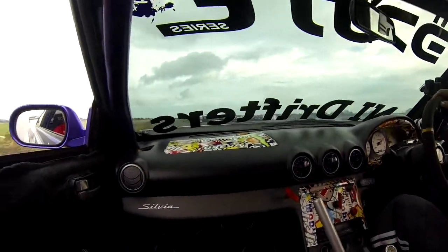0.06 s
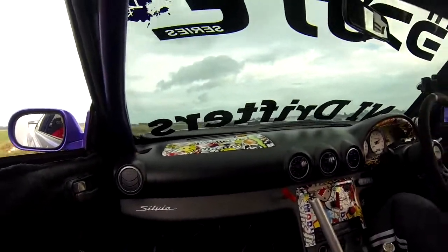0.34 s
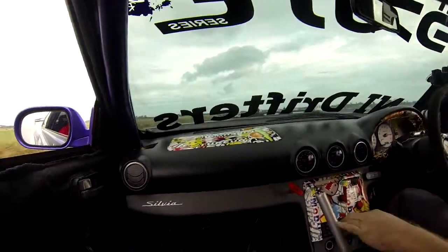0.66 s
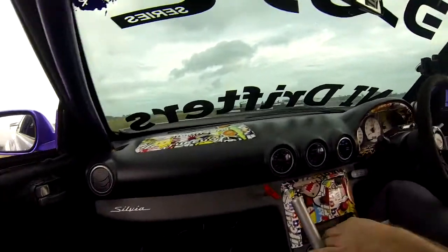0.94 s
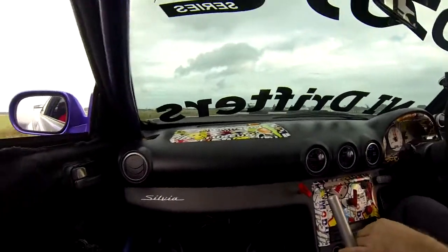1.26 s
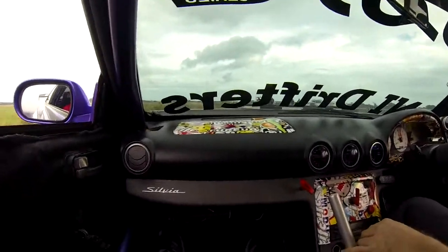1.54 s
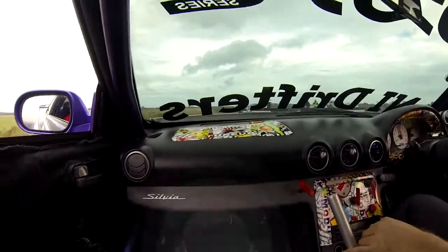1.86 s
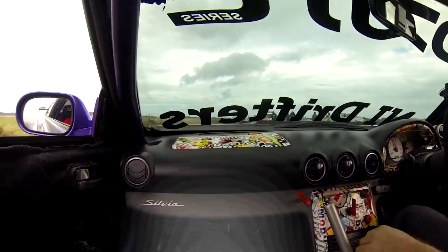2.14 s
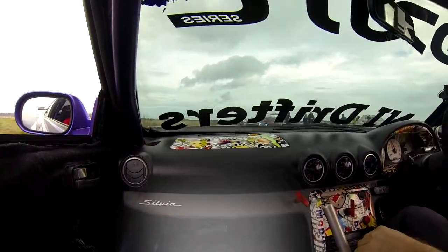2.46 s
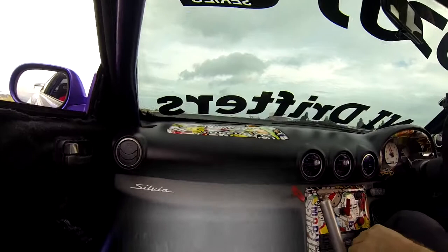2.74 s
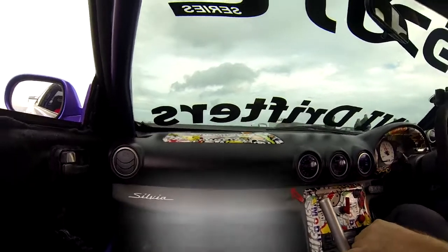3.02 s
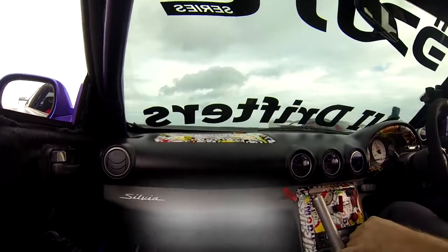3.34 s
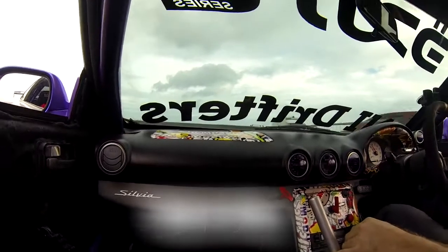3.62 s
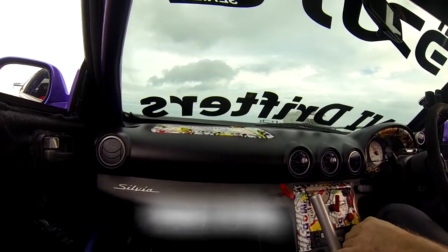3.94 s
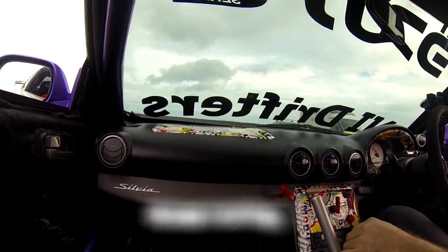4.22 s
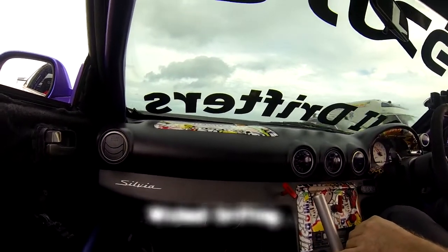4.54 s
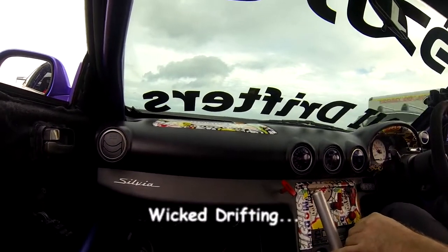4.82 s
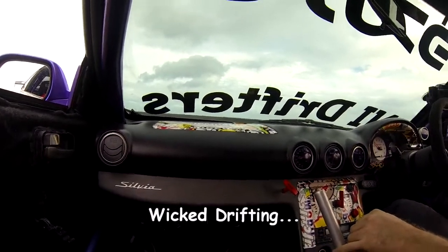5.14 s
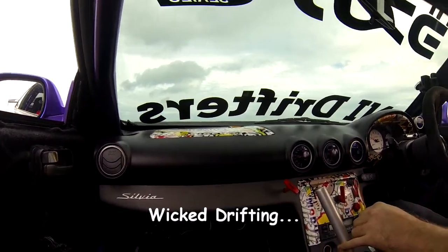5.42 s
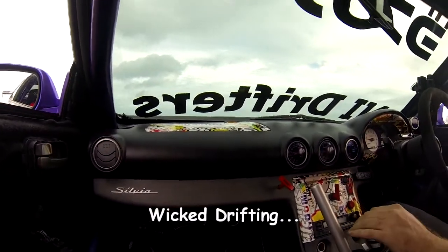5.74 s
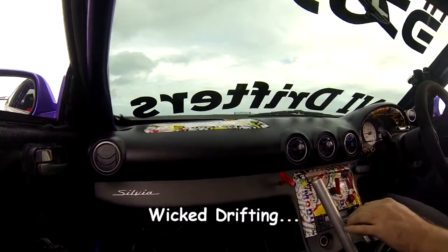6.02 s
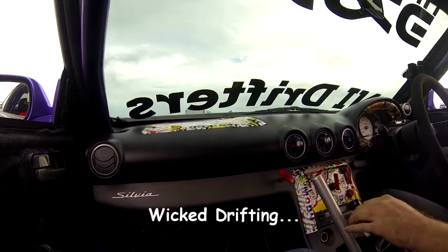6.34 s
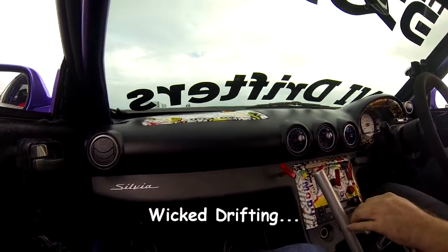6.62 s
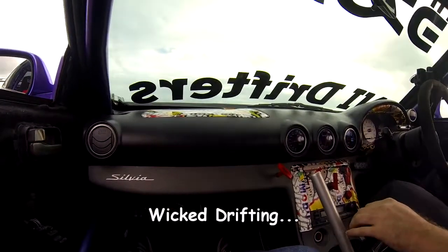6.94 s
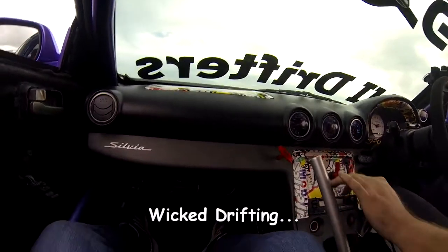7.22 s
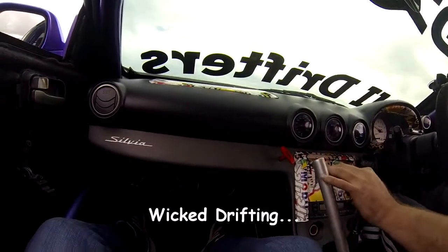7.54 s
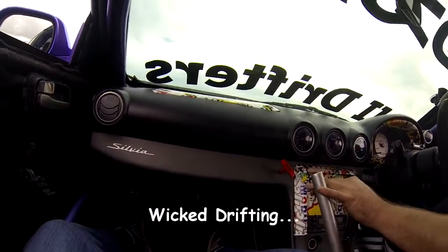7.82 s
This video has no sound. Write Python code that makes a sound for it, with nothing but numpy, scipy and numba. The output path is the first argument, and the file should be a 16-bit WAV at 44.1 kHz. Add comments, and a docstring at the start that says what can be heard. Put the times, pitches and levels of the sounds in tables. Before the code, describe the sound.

Inside a car, the engine flares over a brief tyre squeal, then coasts down amid road rumble and rattles before two throttle blips.

```python
"""A six-cylinder drift car engine, heard from the cabin, flares to its limiter and coasts down.
Its firings make the tone and the exhaust's growl; tyres stick and slip into a squeal, the turbo whistles.
The throttle shuts, the exhaust pops and burbles, and the boost vents. The road sets the body booming,
grit ticks in the wheel arches, panels knock and loose trim rattles.
Near the end the engine almost idles and is blipped twice."""
import sys
import numpy as np
from scipy import signal
from scipy.fft import rfft, irfft, next_fast_len
from scipy.io import wavfile
from scipy.ndimage import map_coordinates
from numba import njit

SR = 44100
rng = np.random.default_rng(int(sys.argv[2]) if len(sys.argv) > 2 else 0)


def waveform_to_disk(signal):
    """Save audio, clipped to [-1, 1], as 16-bit WAV at the path in sys.argv[1]."""
    frames = np.transpose(np.atleast_2d(signal))
    scaled = np.clip(frames, -1, 1) * 32767
    samples = np.round(scaled).astype(np.int16)
    wavfile.write(sys.argv[1], SR, samples)


N = 355887
T = np.arange(N) / SR
FIRINGS_PER_TURN = 3

# the revs, through flare, coast and two blips: time_s, firing_hz
REVS = [(0, 284.1), (.14, 305), (.44, 404.2), (.56, 381.2), (.84, 197.4), (1.05, 210), (2.5, 180.4),
        (3.8, 157.2), (4.6, 137.5), (5.3, 111), (5.7, 99.83), (6.1, 78.4), (6.3, 71.84), (6.53, 72.33),
        (6.68, 53.82), (6.87, 61.12), (6.93, 69.5), (7.0, 97.67), (7.25, 110.1), (7.55, 102.3),
        (7.61, 109.2), (7.8, 170.9), (7.86, 176.7), (8.07, 165.2)]
# floored in the slide, shut to coast, a touch at idle, two blips: time_s, opening (0-1)
THROTTLE = [(.06, 0.35), (.15, 0.93), (.38, 0.84), (.52, 0), (5.95, 0.02), (6.45, 0.2), (6.55, 0.07),
            (6.85, 0.2), (6.89, 0.93), (6.95, 1), (7.0, 0.44), (7.12, 0.61), (7.52, 0.1), (7.62, 0.6),
            (7.7, 0.28), (7.8, 0.26), (7.9, 0.24), (7.97, 0.02)]
# how exhaust and cabin pass an engine tone, droning near 140 Hz: pitch_hz, gain_db
DRONE = [(58, -16), (70, -14), (84, -20.5), (105, -13), (125, -12), (138, -1.5), (147, -3), (158, -12),
         (177, -18.5), (203, -12.5), (235, -19), (260, -18.5), (290, -26.5), (330, -21.5), (355, -29.5),
         (385, -36.5), (560, -27), (590, -16.5), (615, -19.5), (660, -10.5), (720, -23.5), (790, -30)]
# the weaker engine orders: crank_multiple
CRANK_ORDERS = np.array([1, 2, 2.5, 3.5, 4, 5, 7, 8, 9, 12, 15, 18])
# the balance of those orders: gain_db
ORDER_BALANCE = [-22, -6, -11, -28, -14, -27, -18, -9, -9, -13, -17, -25]
# colour of the exhaust pipe's growl: freq_hz, gain_db
GROWL_COLOUR = [(240, 4), (330, 11.5), (480, -5.5), (640, -1), (900, -12), (1250, -2), (1500, -10),
                (2200, -22)]
# colour of the gas rasp: freq_hz, gain_db
RASP_COLOUR = [(450, -3), (520, -19), (650, -1), (850, -2), (1300, -8.5), (2100, -5.5), (2650, -18.5),
               (3300, -14.5), (4300, -25), (5200, -27.5), (7300, -34.5), (10000, -31), (13000, -41.5),
               (15000, -48)]
# intake pipework singing under boost: pitch_hz, width_hz, gain_db
INTAKE_MODES = [(2160, 120, 1), (3020, 180, -4), (3350, 140, 1), (4950, 400, -16)]
# the short whistle as boost comes up: pitch_hz, width_hz, gain_db
WHISTLE_MODES = [(5030, 220, 0), (6230, 220, -5)]
# the turbo's blade tone: time_s, pitch_hz, level_db
TURBO = [(0, 9400, -60), (.1, 10700, -55), (.2, 13000, -68), (.4, 15000, -80), (.85, 14200, -78),
         (1.02, 13400, -63), (1.15, 12200, -73), (1.35, 10500, -76), (1.6, 9000, -88)]
# tyre squeal, swelling twice before the tyres grip: time_s, pitch_hz, level_db, breakup (0-1)
SQUEAL = [(0, 900, -20.5, 0.93), (.12, 931.5, -16, 0.87), (.2, 925, -18, 0.6), (.245, 954.6, -11.5, 0.02),
          (.285, 956, -11, 0), (.315, 975, -20.5, 0.35), (.39, 990, -12.5, .8), (.425, 955, -26, 0.5),
          (.455, 967, -18, 0.53), (.53, 948, -13.5, 0.12), (.56, 945, -15, 0.17), (.595, 928, -19, 0.27),
          (.635, 929, -18.5, .7), (.68, 910, -22.5, 0.79), (.715, 830, -21.5, 1), (.76, 804, -21, 0.88),
          (.8, 820, -26.5, 0.95)]
# tread ribs slipping apart: pitch_ratio, gain_db
RIBS = [(.925, -7), (.965, -2), (1, 0), (1.035, -3), (1.075, -8)]
# cabin resonances that the screech rings: pitch_hz, width_hz, gain_db
SCREECH_MODES = [(780, 22, 0), (1060, 30, -7), (1155, 28, -8)]
# rolling noise, easing as the car slows: time_s, road_db, air_db
RIDE = [(0, -32.5, -42), (.95, -28.5, -41), (1.7, -30, -45.5), (2.4, -29, -44.5), (3.4, -29.5, -46.5),
        (4.15, -33, -49), (4.75, -36, -51.5), (4.98, -34, -52.5), (5.12, -36.5, -49), (5.35, -33, -50),
        (5.75, -37, -51), (6.25, -30.5, -44), (6.85, -33, -48), (6.97, -37, -51), (7.1, -35.5, -47.5),
        (7.45, -38.5, -51), (8.07, -33, -48)]
# colour of the road's roar: freq_hz, gain_db
ROAD_COLOUR = [(300, 6), (420, -0.5), (490, -4.5), (620, -1.5), (780, -4.5), (880, -8), (1000, -6.5),
               (1250, -16), (1400, -15.5), (1700, -25.5), (2200, -31.5)]
# colour of the air's hiss: freq_hz, gain_db
AIR_COLOUR = [(1300, -4.5), (1900, -3), (2200, -6), (2550, -12), (3000, -9), (3600, -17.5), (4400, -25.5),
              (5100, -26.5), (6000, -35.5), (7300, -35), (9000, -35), (14000, -54.5)]
# the body's boom, low during the slide: time_s, level_db
BOOM = [(0, -27), (.74, -27), (.87, -13), (2.4, -16.5), (3.5, -11), (4.15, -14.5), (4.43, -11),
        (4.49, -20.5), (4.62, -21.5), (4.68, -10), (4.86, -19.5), (5.02, -14), (5.85, -15.5), (6.3, -13.5),
        (6.85, -12.5), (7.03, -21.5), (7.35, -13.5), (7.6, -16.5), (7.72, -21), (7.82, -26), (7.92, -12)]
# resonances of the body shell and the air in it: pitch_hz, width_hz, gain_db
BODY_MODES = [(29.5, 14, 3), (51.6, 9.2, -1), (71.66, 17.1, 3.5), (105.3, 12, -1.5), (144.6, 28.3, 1.5),
              (149.1, 24, -9)]
# jolts from bumps, and a low thud as the engine is first blipped: start_s, strength_db
BUMPS = [(0.83, -35), (1.537, -10.5), (1.769, -11.5), (2.085, -20.5), (2.281, -6.5), (2.499, -4),
         (2.852, -8.5), (3.099, -10), (3.267, -9.5), (4.024, -14.5), (5.216, -13.5), (5.546, -9),
         (6.244, -8.5), (6.544, -13), (6.877, -1.5)]
# floor and door panels humming with the road: pitch_hz, width_hz, gain_db
PANEL_MODES = [(211.2, 25, 1.5), (258.7, 18, -2.5), (284.6, 14, -7), (327.8, 16, -8), (402, 12, -9.5)]
# the dashboard's modes: pitch_hz, gain_db, t60_s
DASH_MODES = [(550, 0, .09), (655, 6, .09), (780, 5, .05), (1065, 4, .08), (1324, -4, .12), (1500, -5, .06),
              (1862, -5, .1), (2180, -5, .1), (2350, -11, .06), (3000, -21, .05), (3330, -22, .07)]
# exhaust pops: start_s, strength_db, t60_s
POPS = [(.087, -15, .03), (.378, -23, .06), (.398, -15.5, .045), (.446, -19.5, .06), (.575, -26, .12),
        (.62, -29, .2)]
# colour of the pops: freq_hz, gain_db
POP_COLOUR = [(30, -11), (150, 0), (280, -9), (420, 3), (540, -16), (950, -5), (1400, -30), (4000, -54),
              (10000, -70)]
# colour of the silencer's burble and puffs: freq_hz, gain_db
SILENCER_COLOUR = [(250, -20), (305, -4), (350, 0), (395, -9), (480, -16), (560, -26)]
# unburnt fuel puffing in the silencer: start_s, level_db
SPUTTERS = [(.643, -14), (.68, -12.5), (.797, -14.5), (.86, -12.5), (.94, -15), (1.005, -14), (1.08, -14),
            (1.149, -16.5)]
# strength of each cylinder with the throttle shut: gain_db
LOPSIDED_DB = [0, -9, -3, -12, -1, -7]
# colour of the dust: freq_hz, gain_db
DUST_COLOUR = [(3500, 10.5), (5000, 8), (6400, 2), (7300, -5.5), (9000, -0.5), (11000, -5.5), (13500, -13),
               (15500, -14)]
# colour of the venting boost: freq_hz, gain_db
VENT_COLOUR = [(1800, -2), (3000, -1), (3700, 0), (4600, -10), (7000, -20)]
# handfuls of grit striking the wheel arches: start_s, level_db
GRIT_HITS = [(.815, -54), (1.09, -57), (1.777, -49), (1.933, -55), (2.048, -58), (2.09, -58), (2.213, -55),
             (2.311, -56), (2.836, -53), (3.162, -48.5), (3.397, -55), (3.43, -58), (3.944, -61),
             (4.001, -55), (5.362, -61), (5.815, -60), (5.85, -56), (5.931, -55), (6.28, -61), (7.2, -61),
             (7.308, -61), (7.392, -54), (7.445, -59), (7.858, -54.5), (8.044, -60)]
# colour of the grit: freq_hz, gain_db
GRIT_COLOUR = [(2500, -10), (3500, -2.5), (5200, 0.5), (7000, -6.5), (8500, -2.5), (11000, -4),
               (14000, -12), (16000, -19.5)]
# panels knocking over bumps: start_s, level_db, brightness_db_per_octave
KNOCKS = [(1.439, -21.5, 0), (1.842, -26, 2), (2.021, -29, -4), (2.108, -28, 1), (2.433, -25, 0),
          (2.453, -25, 2), (2.714, -26.5, -1), (2.738, -23, 3), (2.746, -26, 5), (2.777, -32, 1),
          (3.683, -24.5, -2), (4.043, -28.5, 0)]
# colour of a knock's first contact: freq_hz, gain_db
CRACK_COLOUR = [(500, -1), (1000, 0), (1500, -7), (2300, -15), (3000, -26), (5500, -38)]
# dry rattles of loose trim and the gear linkage: start_s, level_db, t60_s, relative_edge_db
RATTLES = [(2.942, -37.5, .11, -20), (3.018, -38, .2, -22), (5.11, -51, .15, -10), (5.17, -52, .12, -10),
           (5.262, -43.5, .18, -15), (5.32, -41, .06, -9), (6.28, -48, .2, -13), (6.912, -48, .12, -5),
           (7.112, -49, .12, -9), (7.145, -48, .18, -11), (7.306, -42.5, .16, -7), (7.335, -45.5, .14, -9),
           (7.453, -47.5, .15, -7), (7.511, -46.5, .15, -7), (7.578, -48, .16, -8), (7.635, -50, .15, -6),
           (7.858, -44, .2, -7), (7.93, -51, .15, -6), (8.04, -45, .15, -4)]
# colour of the rattles: freq_hz, gain_db
RATTLE_COLOUR = [(1300, -6), (2200, -1), (2800, 2), (3700, -9), (4500, -19), (6200, -30), (12000, -44)]
# colour of their metallic edge: freq_hz, gain_db
EDGE_COLOUR = [(3300, -2), (4200, 0), (5300, -1), (6200, -13), (9000, -15), (12000, -25)]


def undb(db):
    """Decibels to gain."""
    return 10 ** (np.asarray(db) / 20)


def unit(x):
    """Scale to rms 1."""
    return x / np.sqrt(np.mean(x ** 2))


def curves(rows):
    """Automation lanes: a table's columns, joined by straight lines in time."""
    times, *columns = np.transpose(rows)
    return [np.interp(T, times, column) for column in columns]


def walk(rate):
    """A smooth random wobble of rms 1 that changes about rate times a second."""
    knots = rng.standard_normal(8192)
    return unit(map_coordinates(knots, [T * rate], order=3, mode="wrap"))


def colour(x, points):
    """EQ through (freq_hz, gain_db) points, falling 36 dB an octave beyond them; rms 1."""
    hz, db = np.transpose(points)
    size = next_fast_len(N)
    freqs = np.maximum(np.fft.rfftfreq(size, 1 / SR), 1)
    octaves_outside = np.maximum(np.log2(hz[0] / freqs), 0) + np.maximum(np.log2(freqs / hz[-1]), 0)
    gain = undb(np.interp(np.log(freqs), np.log(hz), db) - 36 * octaves_outside)
    return unit(irfft(rfft(x, size) * gain, size)[:N])


def noise(points):
    """Noise of a given colour; rms 1."""
    return colour(rng.standard_normal(N), points)


def ring(hz, width):
    """A steep resonance shaken by noise; rms 1."""
    b, a = signal.iirpeak(hz, hz / (1.24 * width), SR)
    return unit(signal.lfilter(b, a, signal.lfilter(b, a, rng.standard_normal(N))))


def resonances(modes):
    """A bank of (pitch_hz, width_hz, gain_db) resonances shaken by noise; rms 1."""
    return unit(sum(undb(db) * np.sqrt(width) * ring(hz, width) for hz, width, db in modes))


def bursts(rows, rise_s):
    """Envelope of hits (start_s, level_db, t60_s): an attack, then an exponential tail."""
    envelope = np.zeros(N)
    for start_s, db, t60 in rows:
        start = max(int(start_s * SR), 0)
        age = T[:N - start]
        tail = 1000 ** -np.minimum(age / max(t60, .005), 10)
        envelope[start:] += undb(db) * (1 - np.exp(-age / rise_s)) * tail
    return envelope


def turn(hz):
    """Phase of something that turns hz times a second."""
    return 2 * np.pi * np.cumsum(hz) / SR


def firing_count(crank):
    """How many cylinders have fired so far."""
    return np.floor(FIRINGS_PER_TURN * crank / (2 * np.pi)).astype(int)


def firings(crank):
    """One click for each cylinder that fires."""
    return np.diff(firing_count(crank), prepend=0)


def drone(hz):
    """Gain in dB of the exhaust and cabin for a tone at hz."""
    pitches, db = np.transpose(DRONE)
    return np.interp(np.log(hz), np.log(pitches), db)


def engine(crank, firing_hz, throttle):
    """The firing tone and its octave swell with load and in the drone; power adds the other orders."""
    full_power_hz, octave_opening = 298, .18  # a touch of throttle already brings the octave out
    tone_db = -7.5 + 15 * throttle + drone(firing_hz)
    octave_db = -17 + 10 * (1 - np.exp(-throttle / octave_opening)) + drone(2 * firing_hz)
    rough_db = .84 * walk(27) + 1.5 * throttle * walk(70)
    phase = FIRINGS_PER_TURN * crank
    tone = undb(tone_db + rough_db) * np.sin(phase)
    octave = undb(octave_db + 2 * walk(60)) * np.sin(2 * phase + rng.uniform(0, 2 * np.pi))
    orders = sum(undb(db + 3.7 * walk(30.5)) * np.sin(order * crank + rng.uniform(0, 2 * np.pi))
                 for order, db in zip(CRANK_ORDERS, ORDER_BALANCE))
    power = throttle * np.minimum(firing_hz / full_power_hz, 1)
    return np.sqrt(2) * (tone + octave + undb(-20.5) * power ** 1.6 * orders)


def growl(crank, throttle):
    """Every firing sends a pulse down the exhaust pipe, harder as the throttle opens."""
    uneven_pulses = firings(crank) * undb(3 * walk(200))
    return undb(-32) * throttle * colour(uneven_pulses, GROWL_COLOUR)


def boost_rush(crank, throttle):
    """During the flare, gas under boost rasps, sings and whistles, pulsing with the firings."""
    spool_down_per_s = 2.16
    lost = spool_down_per_s * T
    boost = np.maximum.accumulate(throttle + lost) - lost  # follows the throttle up at once, down slowly
    intake = undb(-33.5 - 26 * (1 - boost)) * resonances(INTAKE_MODES)
    whistle = bursts([(.118, -33, .27)], rise_s=.04) * resonances(WHISTLE_MODES)
    rasp = noise(RASP_COLOUR) * undb(-22 - 23 * (1 - boost) + walk(80))
    pulsing = 1 + .5 * np.sin(FIRINGS_PER_TURN * crank)
    fade_out = np.interp(T, [.75, .95], [1, 0])
    return fade_out * pulsing * (rasp + intake + whistle)


def turbo():
    """The compressor's blade tone, smeared into a breathy band by the rushing air."""
    hz, db = curves(TURBO)
    smear = noise([(20, 0), (250, -3), (700, -14)])
    fade_out = np.interp(T, [1.35, 1.6], [1, 0])
    return fade_out * undb(db) * smear * np.sin(turn(hz))


def tread_rib(hz, waver):
    """One rib sticks and slips: a wavering note with a faint octave."""
    phase = turn(hz * (1 + waver * (walk(45) + walk(260))))
    return np.sin(phase) + undb(-19) * np.sin(2 * phase + walk(220))


def tyre_squeal():
    """Locked together, the ribs sing one note; broken up, they beat in a screech that rings the cabin."""
    hz, db, breakup = curves(SQUEAL)
    locked = tread_rib(hz, waver=.005)
    strands = unit(sum(undb(rib_db + 2.5 * walk(55)) * tread_rib(hz * ratio, waver=.011)
                       for ratio, rib_db in RIBS))
    tread = np.sqrt(2 * (1 - breakup)) * locked + np.sqrt(breakup) * strands
    ringing = undb(-9) * np.sqrt(breakup) * resonances(SCREECH_MODES)
    hop_hz = 38 * (1 + .25 * walk(30))  # the sliding tyre hops and chops its squeal
    judder = 1 + .3 * breakup * np.sin(turn(hop_hz))
    sliding = np.interp(T, [.76, .83], [1, 0])
    return sliding * undb(db) * judder * (tread + ringing)


def cabin():
    """The ground shakes the body, harder at each bump; panels and dashboard hum under road and air."""
    road_db, air_db = curves(RIDE)
    boom_db = curves(BOOM)[0]
    jolts = undb(-6.5) * bursts([(s, db, .4) for s, db in BUMPS], rise_s=.009)
    boom = resonances(BODY_MODES) * (undb(boom_db) + jolts)
    panels = resonances(PANEL_MODES) * undb(-8 + .42 * (boom_db + road_db))
    dash_bands = [(hz, np.log(1000) / (np.pi * t60), db) for hz, db, t60 in DASH_MODES]  # decay to width
    dashboard = resonances(dash_bands) * undb(road_db - 22.5)
    roar = noise(ROAD_COLOUR) * undb(road_db + 1.1 * walk(25))
    hiss = noise(AIR_COLOUR) * undb(air_db + walk(40))
    return boom + panels + dashboard + roar + hiss


def exhaust_pops():
    """The exhaust pops in short, dull thumps around the flare."""
    return undb(11.5) * bursts(POPS, rise_s=.002) * noise(POP_COLOUR)


def overrun(crank):
    """Once the foot lifts, lopsided firings burble and unburnt fuel puffs in the silencer."""
    lift_s, misfire_db = .62, 5
    cylinder = firing_count(crank) % len(LOPSIDED_DB)
    pulses = firings(crank) * undb(np.array(LOPSIDED_DB)[cylinder] + misfire_db * walk(200))
    burble = colour(pulses, SILENCER_COLOUR) * bursts([(lift_s, -30, 7)], rise_s=.15)
    puffs = noise(SILENCER_COLOUR) * bursts([(s, db, .14) for s, db in SPUTTERS], rise_s=.018)
    return burble + puffs


def dust():
    """The slide's dust cloud thins to a faint bed; a little more trails each handful of grit."""
    slide_end_s, bed_db = .67, -72.5
    cloud = bursts([(slide_end_s, -47.5, 4.9)], rise_s=.042)
    trails = bursts([(s, db - 14, 1) for s, db in GRIT_HITS], rise_s=.01)
    density = np.sqrt(cloud ** 2 + trails ** 2 + undb(bed_db) ** 2)
    return noise(DUST_COLOUR) * density * undb(2 * walk(29) + 2 * walk(410))


def boost_vent():
    """With the throttle shut, the boost escapes in one short hiss."""
    return noise(VENT_COLOUR) * bursts([(.812, -27, .15)], rise_s=.04)


def grit():
    """A handful of grit hits the wheel arch at once, then spatters away."""
    handfuls = bursts([(s, db, .16) for s, db in GRIT_HITS], rise_s=.001)
    spatter = undb(3 * walk(600) - .5)
    return handfuls * spatter * noise(GRIT_COLOUR)


def knocks():
    """Each knock cracks, then rings the dashboard's modes with its own level, mix and brightness."""
    hz, mode_db, t60 = np.transpose(DASH_MODES)[:, :, None]
    age, ringing = T[:SR // 5], np.zeros(N)
    contact_s = .0012
    attack = 1 - np.exp(-age / contact_s)
    for start_s, db, brightness in KNOCKS:
        mix, detune, phase = rng.standard_normal((3, len(DASH_MODES), 1))
        gain = undb(mode_db + brightness * np.log2(hz / 1500) + 2.5 * mix)
        chatter = .04 * np.cumsum(rng.standard_normal((len(DASH_MODES), len(age))), axis=1)
        cycles = hz * (1 + .017 * detune) * age + phase
        modes = gain * 1000 ** (-age / t60) * np.sin(2 * np.pi * cycles + chatter)
        knock = attack * modes.sum(axis=0) / np.sqrt(np.sum(gain ** 2) / 2)
        start = int(start_s * SR)
        ringing[start:start + len(age)] += undb(db) * knock
    padding = signal.butter(4, 3600, fs=SR, output="sos")
    cracks = bursts([(s, db - 2.5, .07) for s, db, _ in KNOCKS], rise_s=contact_s) * noise(CRACK_COLOUR)
    return signal.sosfilt(padding, ringing) + cracks


def rattles():
    """A loose part clacks once, then chatters to rest; metal parts add a bright edge."""
    clacks = bursts([(s, db - 16.5, .045) for s, db, _, _ in RATTLES], rise_s=.0003)
    chatter = undb(3 * walk(250) - 1)
    body = bursts([(s, db, t60) for s, db, t60, _ in RATTLES], rise_s=.003)
    edge = bursts([(s, db + edge_db, t60) for s, db, t60, edge_db in RATTLES], rise_s=.002)
    return (clacks + chatter * body) * noise(RATTLE_COLOUR) + chatter * edge * noise(EDGE_COLOUR)


def scene():
    """Engine, tyres, body and loose parts, mixed in mono inside the car."""
    firing_hz = curves(REVS)[0]
    throttle = curves(THROTTLE)[0]
    crank = turn(firing_hz / FIRINGS_PER_TURN * (1 + .0047 * walk(45)))
    motor = engine(crank, firing_hz, throttle) + growl(crank, throttle)
    gas = boost_rush(crank, throttle) + overrun(crank) + boost_vent() + turbo() + exhaust_pops()
    return (motor + gas + tyre_squeal() + cabin() + dust() + grit() + knocks() + rattles())[None]


@njit
def limiter(x, threshold, step, hold_s, ceiling, release_s):
    """Each loud peak knocks the gain down a step with a dull tick; peaks over the ceiling duck more."""
    y = np.empty(len(x))
    gain, eased, smooth, wait_s = 1., 1., 1., 0.
    for i in range(len(x)):
        gain += (1 - gain) / (release_s * SR)
        wait_s -= 1 / SR
        if abs(x[i]) * gain > threshold and wait_s <= 0:
            gain, wait_s = gain * step, hold_s
        if abs(x[i]) * gain > ceiling:
            gain = ceiling / abs(x[i])
        eased += .5 * (gain - eased)  # the step is rounded over a few samples
        smooth += .5 * (eased - smooth)
        y[i] = x[i] * smooth
    return y


def record(dry):
    """The master chain: a limiter holds the loudest peaks and a steep low-pass cuts the top."""
    held = limiter(dry[0], threshold=.62, step=.93, hold_s=.011, ceiling=.85, release_s=.035)
    top_cut = signal.ellip(8, .2, 70, 15300, fs=SR, output="sos")
    return signal.sosfilt(top_cut, held)[None]


dry = scene()
out = record(dry)
waveform_to_disk(out)
```